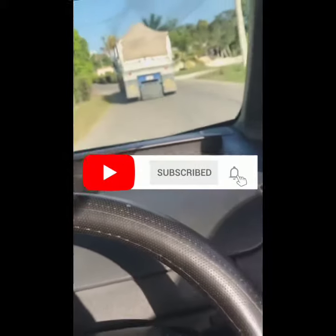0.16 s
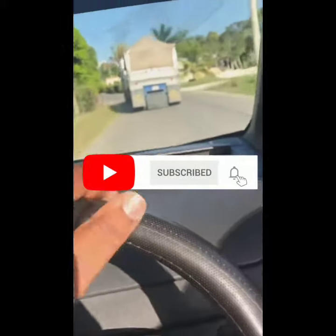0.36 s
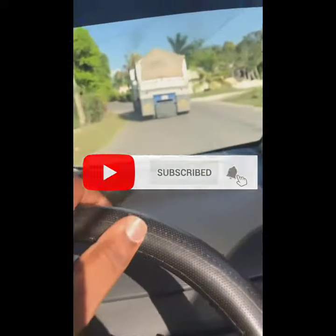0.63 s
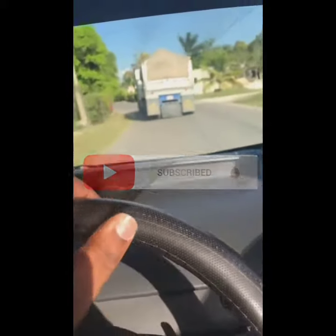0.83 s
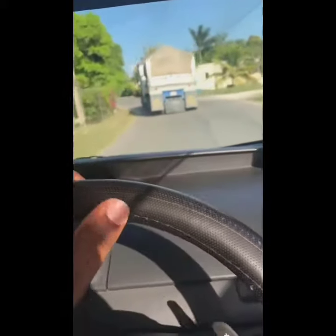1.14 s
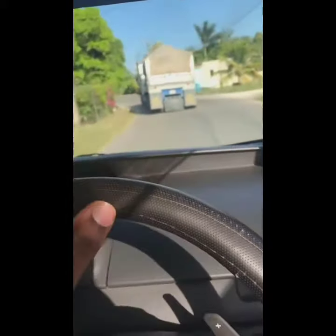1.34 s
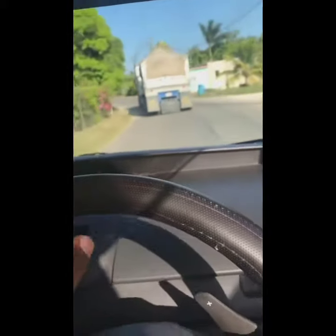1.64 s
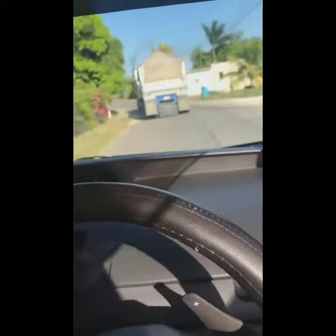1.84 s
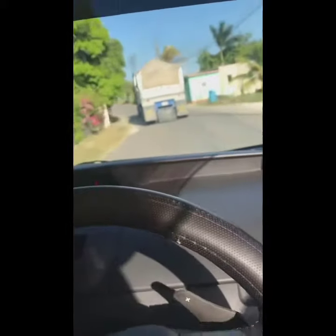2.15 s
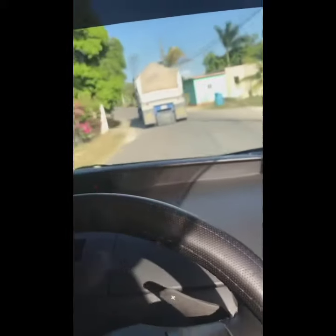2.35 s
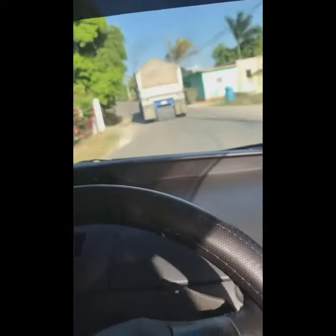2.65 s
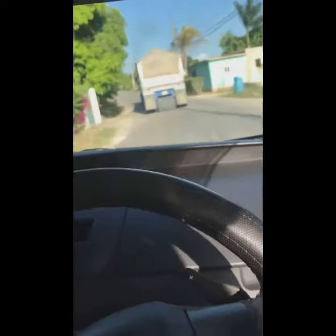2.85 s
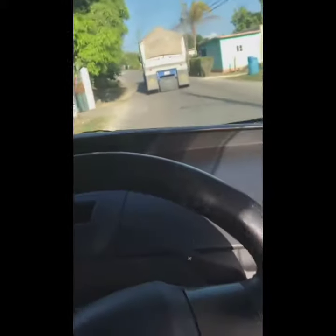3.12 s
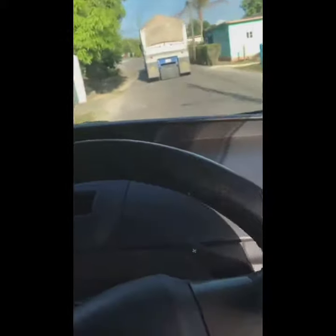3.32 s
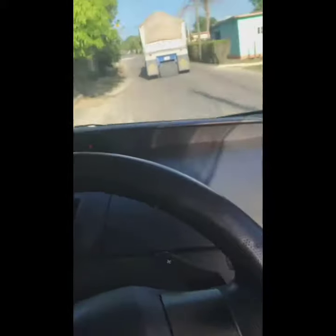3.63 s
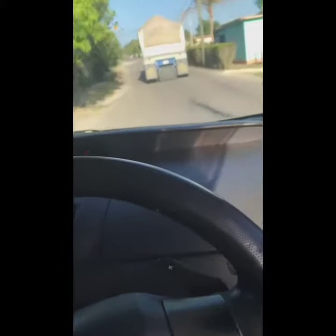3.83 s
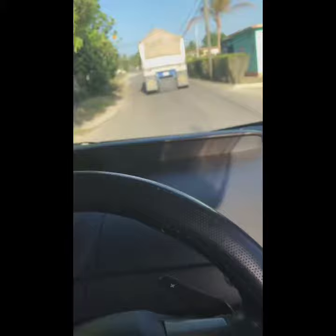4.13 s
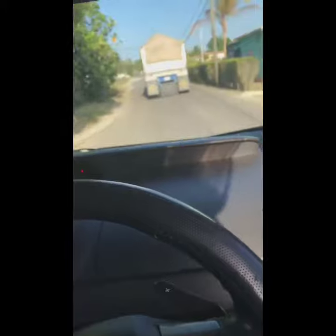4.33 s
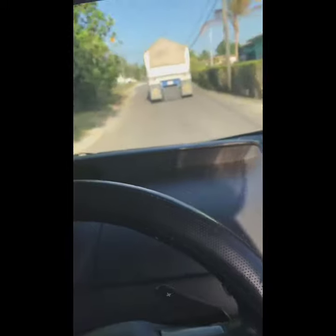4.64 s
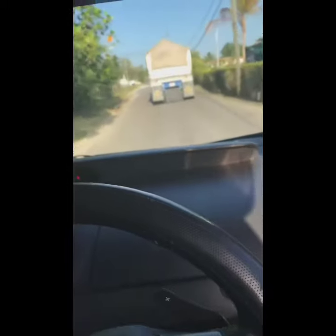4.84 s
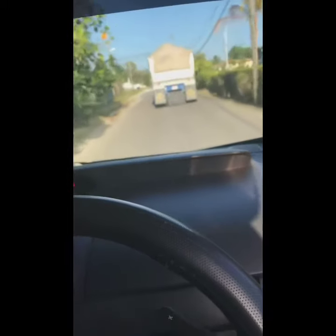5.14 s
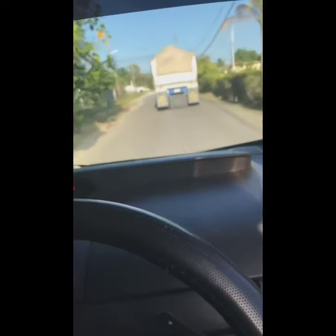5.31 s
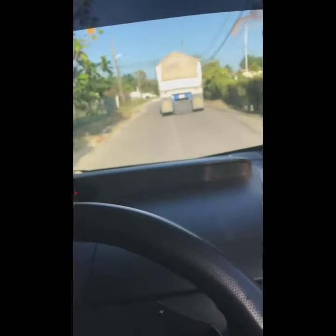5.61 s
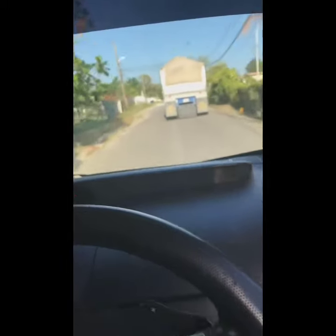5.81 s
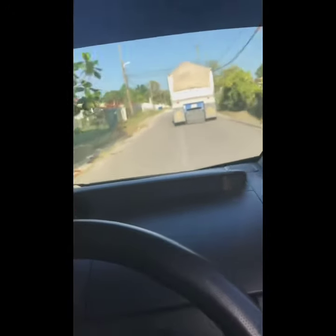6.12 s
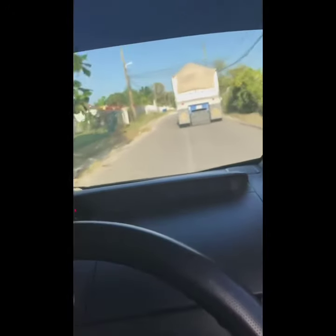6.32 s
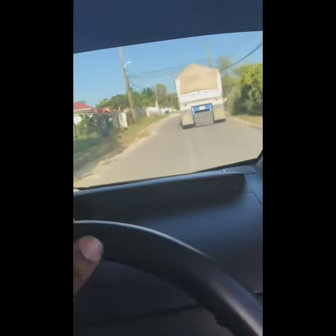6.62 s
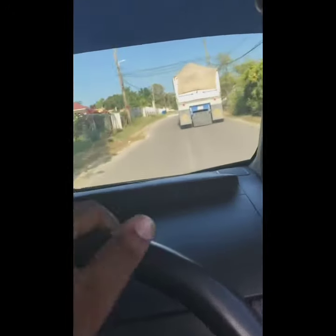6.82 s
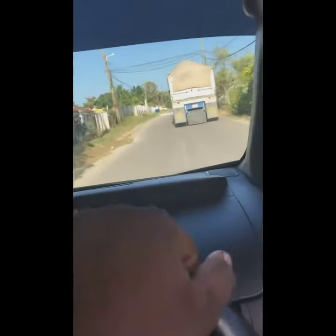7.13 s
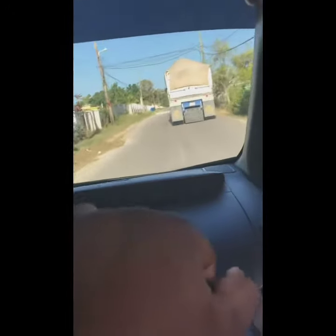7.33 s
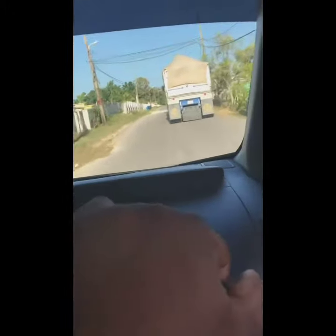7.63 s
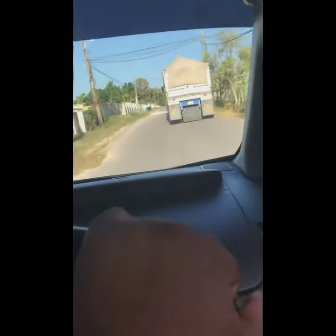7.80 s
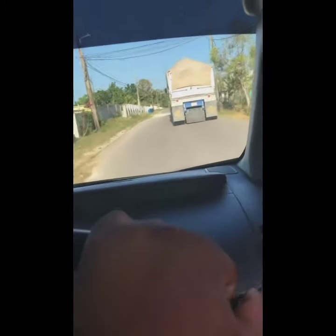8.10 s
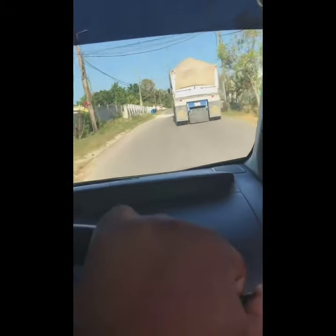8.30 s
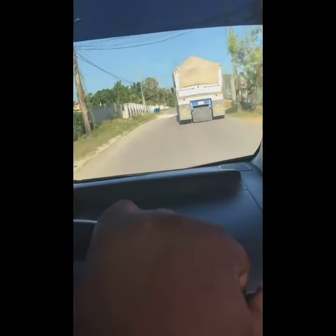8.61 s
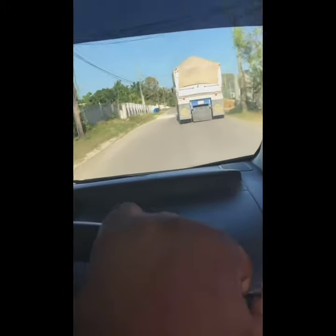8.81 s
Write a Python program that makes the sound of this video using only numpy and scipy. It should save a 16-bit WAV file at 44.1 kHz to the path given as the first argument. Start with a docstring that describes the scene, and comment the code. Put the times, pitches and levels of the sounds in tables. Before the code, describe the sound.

From the driver's seat, a rough diesel drone fills the cab over continuous tyre rumble. The throttle lifts and returns, dashboard panels buzz briefly, and a low exhaust tone from a lorry ahead rises and falls. After a quieter lift, a juddering gear engagement rattles, followed by slower, heavier engine pulses, thin trim rasp, a faint hand rub and two small late knocks.

```python
"""Inside the cab of a four-cylinder diesel truck following a lorry along a country road, over rumbling tyres.
The driver eases off, then pulls again: firing orders, gated noise and a whistling turbo, the lorry's tone ahead.
He lifts and changes up; the clutch bites with a judder of filtered clicks and the gears chatter.
The engine lugs on at low revs, booming through the cab resonances, with a hand sliding round the wheel,
rasping trim and at last two combustion knocks."""
import sys
import numpy as np
from scipy import signal
from scipy.fft import rfft, irfft
from scipy.io import wavfile

SR = 44100
rng = np.random.default_rng(int(sys.argv[2]) if len(sys.argv) > 2 else 0)


def put_to_file(sound):
    """Save the sound as 16-bit audio at rate SR, in the file named by the first command-line argument."""
    columns = np.atleast_2d(sound).T  # one column per channel
    safe = np.clip(columns, -1, 1)
    whole_steps = np.round(safe * 32767)
    wavfile.write(sys.argv[1], SR, whole_steps.astype(np.int16))


N = 395136

# Engine speed. Each row: time in seconds, firings per second.
SPEED = [(0, 92.5), (.27, 93.6), (.45, 80.3), (.85, 84), (1.27, 80.7), (1.54, 85.3), (1.9, 85.8),
         (2.5, 89.5), (3.23, 92), (3.29, 78.6), (3.99, 78.3), (4.16, 73), (4.7, 74), (4.95, 72.4),
         (5.5, 70.2), (6.4, 66.7), (7.3, 66.2), (7.8, 65.2), (8.3, 65.5), (8.55, 66.4), (8.96, 66.2)]
# How hard the engine is fuelled. Each row: time in seconds, effort in dB relative to full pull.
EFFORT = [(0, -0.5), (.28, 0), (.5, -5), (.8, -10.5), (1, -4.5), (1.22, -0.93), (2.2, 0.5), (3.15, -2),
          (3.26, -7.5), (3.5, -12), (4.68, -12), (4.76, -4), (6.3, -7), (6.52, -10), (7, -7.5), (7.4, -2.5),
          (7.7, -1.2), (8.96, -3)]
# Strength of each cylinder in firing order, in dB.
CYLINDER_DB = [0.95, -1.5, 0.61, -0.72]
# Laws of loudness. Each: level in dB at full pull and CRUISE_HZ, dB per dB of effort, dB per extra firing per second.
THUD_LAW = (-35, 0.92, 0.16)
CLATTER_LAW = (-36, 2.46, 0.48)
PANEL_LAW = (-37, 1.48, 0.25)
INTAKE_LAW = (-50, 0.61, 0.21)
CRUISE_HZ = 90.06   # firing rate
BOOST_LAG_S = 0.26   # the intake air follows the effort late

# Hum at twice the firing rate. Each row: time in seconds, level in dB.
HUM = [(0, -36), (.75, -37), (.94, -29), (1.06, -38), (1.24, -26.5), (1.36, -34.5), (1.8, -34.5),
       (2.2, -31), (3.2, -31), (3.27, -36.5), (4.01, -33), (4.12, -39.5), (5.3, -33), (6.5, -37.5),
       (7.8, -36.5), (8.96, -37.5)]
# Air resonances of the cab. Each row: centre in Hz, width in Hz, level in dB at full pull.
CAB_BOOMS = [(64.08, 3.9, -17.5), (81, 28.5, -29), (214, 9.8, -27.5)]
FIRST_ORDER_DB_PER_DB, THIRD_ORDER_DB_PER_DB = 0.74, 1.7   # rise with effort
BOOM_WAVER_DB = 1.84

# Spectrum of the block's thuds. Each row: frequency in Hz, relative density in dB per Hz.
BLOCK = [(330, -6.5), (385, -6.5), (470, 2.5), (570, -1), (690, 1), (780, -6.5), (890, 2.5), (980, 0),
         (1200, 0), (1500, -14.5), (1730, -5.5), (1900, -28.5), (4000, -30)]
# Spectrum of the cylinder head's cracks. Each row: frequency in Hz, relative density in dB per Hz.
HEAD = [(700, -4.5), (1200, -2.5), (1550, -3), (1700, 2), (1850, -8.5), (2040, -11.5), (2250, -23),
        (2950, -11.5), (3500, -19), (5000, -31)]
LUG_REGULAR_DB = 5   # at low revs under load the thuds repeat more exactly
# Rasping dashboard panels. Each row: centre in Hz, width in Hz, relative gain in dB.
PANELS = [(1327, 140, 2.5), (1742, 52, -2), (2077, 7.4, -12), (3220, 290, -16)]
PANEL_BEST_HZ, PANEL_FALL_DB_PER_HZ, PANEL_RANGE_DB = 84.7, 0.5, 11.5   # loudest near this firing rate
# Engine cover resonances at low revs. Each row: centre in Hz, width in Hz, relative gain in dB.
COVER_MODES = [(479, 22, 3.5), (718, 56, 3.5), (1060, 64, 0.5), (1197, 39, 1.5)]
COVER_DB = -39   # at full pull, fully lugging
# Rough drone of the engine. Each row: time in seconds, level in dB.
DRONE = [(0, -41.5), (.3, -49), (.42, -78), (.9, -43), (3.15, -46), (3.25, -75), (6.3, -59.5), (7.9, -45.5),
         (8.96, -50.5)]
DRONE_ORDER = 5.33   # cycles per firing

# Intake air spectrum. Each row: frequency in Hz, relative density in dB per Hz.
HISS = [(1900, 11.5), (2500, 9.5), (2950, 9.5), (3500, 7), (4950, -1), (6000, 1.5), (7700, -8),
        (9000, -4.5), (10500, -41)]
# Turbo whistle. Each row: time in seconds, pitch in Hz, level in dB.
TURBO = [(0, 10700, -77), (.48, 9300, -60.5), (.66, 8450, -66), (.9, 7740, -72), (1.5, 9100, -62.5),
         (1.72, 9400, -62), (2.4, 9200, -72.5), (3.45, 8856, -73), (3.8, 8130, -95)]

# Gear case resonances. Each row: centre in Hz, width in Hz, relative gain in dB.
GEARCASE = [(640, 95, 8.5), (830, 100, 13.5), (1130, 200, -5)]
# Rough tones of the gears. Each row: cycles per firing, width in Hz, level in dB before the bite envelope.
GEAR_TONES = [(7.5, 19, -46.5), (9.1, 24, -43), (11.7, 33, -52), (12.5, 26, -49)]
# Gearbox whine. Each row: time in seconds, pitch in Hz, level in dB.
WHINE = [(1.8, 237, -59), (2.1, 243.1, -43), (3.15, 273, -48.5), (3.4, 280, -40), (4.3, 279.8, -46.5),
         (6.2, 277.6, -51)]
CLUTCH_BITES_S = 4.68

# Driveline knocks at the clutch bite, then two combustion knocks of the lugging engine (the last two rows).
# Each row: time in seconds, click in dB before KNOCK_DB and colour.
KNOCKS = [(4.707, -19.5), (4.722, -15), (4.731, -16.5), (4.76, -14), (4.781, -20.5), (4.802, -16.5),
          (4.808, -22.5), (4.86, -12), (4.98, -23), (5.144, -26), (5.191, -26), (8.188, -23), (8.481, -27)]
# Colour of the knocks in the cab. Each row: frequency in Hz, gain in dB before KNOCK_DB.
KNOCK_COLOUR = [(70, -6), (185, 12.5), (270, -9), (450, -3), (630, -0.5), (730, -3.5), (1020, -1),
                (1270, -11), (1950, -25), (2500, -22.5), (3600, -36), (8000, -59)]
KNOCK_DB = 28.5   # how strongly the knocks reach the cab
# Ticks of gear lever and cab fittings. Each row: time in seconds, click in dB before the fittings ring.
TICKS = [(2.555, -51.5), (2.845, -50.5), (4.674, -60), (4.877, -62), (4.981, -58), (6.516, -58.5),
         (6.86, -57)]
# Ringing of the fittings. Each row: centre in Hz, width in Hz, relative gain in dB.
FITTINGS = [(2380, 360, 16), (3180, 470, 2), (4100, 550, 7)]

# Flares of dashboard buzz. Each row: time in seconds, half length in seconds, pitch in Hz, peak level in dB.
BUZZES = [(1.228, 0.051, 1290, -37), (1.783, 0.053, 1324, -35.5), (2.134, 0.02, 1805, -35),
          (2.607, 0.11, 1783, -39)]
# Thin rasp of loose trim. Each row: time in seconds, level in dB.
RASP = [(4.69, -87), (4.73, -50), (4.87, -47.5), (4.99, -53.5), (5.1, -56.5), (6.7, -63), (7.6, -52.5),
        (8.2, -63), (8.8, -57)]
# Resonances of that trim. Each row: centre in Hz, width in Hz, relative gain in dB.
RASP_MODES = [(1700, 200, 1.5), (2545, 340, 10.5), (4130, 330, -7.5)]
PALM_S, PALM_HALF_S, PALM_DB = 6.92, 0.44, -65   # a hand slides round the wheel rim

# Exhaust tone of the lorry ahead. Each row: time in seconds, pitch in Hz, level in dB.
LORRY = [(1.1, 37.8, -71), (1.4, 41.74, -30.5), (2.1, 56.7, -24), (2.3, 60.38, -32), (2.6, 73.2, -31.5),
         (3.1, 58.76, -33), (3.47, 53.76, -23.5), (3.85, 48.48, -42)]
# Tyre rumble spectrum. Each row: frequency in Hz, relative density in dB per Hz.
RUMBLE = [(26, -11), (33, -6), (42, -0.5), (56, 3.5), (68, -4.5), (82, 5), (100, -5.5), (125, -2),
          (160, -5), (290, -14.5), (400, -20.5), (700, -27), (1500, -33.5)]
ROAD_DB, ROAD_SWELL_DB = -29.5, 1.02   # tyre rumble and its swing over uneven tarmac
# Rough patches that drum in the cab. Each row: time in seconds, half length in seconds, peak level in dB.
BUMPS = [(4.424, 0.17, -25), (5.608, 0.075, -25), (6.197, 0.12, -31), (6.605, .1, -29)]
BUMP_HZ = 83.5
CUTOFF_HZ = 9750


def from_db(db):
    """Decibels to gain."""
    return 10 ** (np.asarray(db) / 20)


def rms_one(x):
    """Scale to unit rms."""
    return x / np.sqrt(np.mean(x ** 2) + 1e-20)


def in_time(rows):
    """The columns of a curve after its time column, one value per sample."""
    s, *columns = np.transpose(rows)
    return [np.interp(np.arange(N) / SR, s, c) for c in columns]


def drift(rate_hz):
    """Slow random wander of spread 1: two-pole noise, computed every 40 samples."""
    r = np.exp(-80 * np.pi * rate_hz / SR)
    noise = rng.standard_normal(N // 40 + 2002)
    slow = signal.lfilter([1], [1, -2 * r, r * r], noise)[2000:]   # skip the settling
    return np.interp(np.arange(N) / 40, np.arange(len(slow)), rms_one(slow))


def colour(x, spectrum, size=8192):
    """Minimum-phase filter with the given spectrum, falling steeply beyond its ends."""
    hz, db = np.transpose(spectrum)
    octave = np.log2(np.maximum(np.fft.rfftfreq(size, 1 / SR), 1))
    known = np.log2(hz)
    outside = np.abs(octave - np.clip(octave, known[0], known[-1]))
    gain_db = np.interp(octave, known, db) - np.minimum(30 * outside, 60)
    cepstrum = irfft(np.log(from_db(gain_db)))
    cepstrum[1:size // 2] *= 2   # fold onto positive time: causal
    cepstrum[size // 2 + 1:] = 0
    impulse = irfft(np.exp(rfft(cepstrum)))
    return signal.fftconvolve(x, impulse)[:N]


def resonate(x, modes):
    """Parallel two-pole resonances, each with its dB as the gain on top."""
    out = 0
    for hz, width_hz, db in modes:
        r = np.exp(-np.pi * width_hz / SR)
        poles = [1, -2 * r * np.cos(2 * np.pi * hz / SR), r * r]
        ringing = signal.lfilter([1, 0, -1], poles, x + 1e-18)
        out = out + from_db(db) * (1 - r * r) / 2 * ringing
    return out


def tone(turns):
    """Sine of unit rms on a running count of cycles."""
    return np.sqrt(2) * np.sin(2 * np.pi * turns)


def narrow_noise(turns, width_hz):
    """Smeared tone of unit rms: two quadrature carriers, each with its own slow random level."""
    return rms_one(drift(width_hz) * tone(turns) + drift(width_hz) * tone(turns + 1 / 4))


def gliding_tone(rows, waver_hz, waver_rate_hz, flutter_db):
    """A rotating part's tone, wavering in pitch and level."""
    hz, db = in_time(rows)
    turns = np.cumsum(hz + waver_hz * drift(waver_rate_hz)) / SR
    return from_db(db + flutter_db * drift(22)) * tone(turns)


def swells(rows):
    """Gaussian swell of each row's time, half length and peak dB."""
    t = np.arange(N) / SR
    return [from_db(db) * np.exp(-((t - s) / half_s) ** 2) for s, half_s, db in rows]


def by_law(law, effort_db, x):
    """An engine sound grows louder with effort and with speed."""
    full_db, per_effort, per_speed = law
    firing_hz, = in_time(SPEED)
    level_db = full_db + per_effort * effort_db + per_speed * (firing_hz - CRUISE_HZ)
    return from_db(level_db) * rms_one(x)


def firing_gate(turns, decay, depth, rise=.12):
    """Envelope that swells and dies at each firing (rise, decay in firings), by cylinder and by chance."""
    firing = np.floor(turns).astype(int)
    phase = turns % 1
    chance_db = 1.6 * rng.standard_normal(1000)[firing]
    strength = from_db(np.take(CYLINDER_DB, firing % len(CYLINDER_DB)) + chance_db)
    burst = np.minimum(phase / rise, 1) * np.exp(-phase / decay)
    share = np.clip(depth, 0, 1)
    return rms_one(1 - share + share * rms_one(strength * burst))


def crank_pattern(turns, jitter, half_order_db, size=4096):
    """Vibration repeating every crank turn (two firings): low firing harmonics and weaker half orders."""
    orders = np.exp(2j * np.pi * rng.random(size // 2 + 1))
    orders[1::2] *= from_db(half_order_db)
    orders[64:] = 0
    angle = (turns + jitter * drift(30)) / 2 % 1
    return rms_one(np.interp(angle * size, np.arange(size), irfft(orders)))


def excitation(turns, regular_db, decay, depth, jitter=0.014):
    """Vibration that repeats with the crank, under random bursts at each firing."""
    regular = from_db(regular_db) * crank_pattern(turns, jitter, half_order_db=-0.5)
    return regular + rng.standard_normal(N) * firing_gate(turns, decay, depth)


def after_bite(attack_s, hold_s, sag_db_per_s, release_s):
    """Envelope from the clutch's bite: a quick rise, a sagging hold, then a decay."""
    age = np.maximum(np.arange(N) / SR - CLUTCH_BITES_S, 0)
    release = np.exp(-np.maximum(age - hold_s, 0) / release_s)
    return np.minimum(age / attack_s, 1) * from_db(-sag_db_per_s * age) * release


def blows(events, scatter_s, scatter_db):
    """Each contact is a click with a dying scatter of noise."""
    out = np.zeros(N)
    age = np.arange(SR // 5) / SR
    for s, db in events:
        burst = from_db(scatter_db) * rng.standard_normal(len(age)) * np.exp(-age / scatter_s)
        burst[0] += 1
        at = round(s * SR)
        out[at:at + len(age)] += from_db(db) * burst[:N - at]
    return out


def combustion(turns, firing_hz, effort_db):
    """Each firing thuds through the block, rings the cylinder head and shakes the panels."""
    # under load at low revs the strokes stand apart
    lugging = np.clip((85 - firing_hz) / 20, 0, 1) * from_db(0.68 * effort_db)
    uneven = from_db(.6 * drift(14))

    regular_db = -12.5 + LUG_REGULAR_DB * lugging
    strokes = excitation(turns, regular_db, decay=0.25, depth=0.38 + 0.76 * lugging, jitter=0.0071)
    thuds = by_law(THUD_LAW, effort_db, colour(strokes, BLOCK))

    clatter = excitation(turns, regular_db=-13.0, decay=0.73, depth=0.25 + .5 * lugging)
    cracks = by_law(CLATTER_LAW, effort_db, colour(clatter * from_db(.5 * drift(11.0)), HEAD))

    shaking = excitation(turns, regular_db=-8, decay=0.73, depth=0.22)
    panels = resonate(shaking, PANELS) * from_db(2.4 * drift(9.1))
    off_best_db = np.minimum(PANEL_FALL_DB_PER_HZ * np.abs(firing_hz - PANEL_BEST_HZ), PANEL_RANGE_DB)
    rasp = from_db(-off_best_db) * by_law(PANEL_LAW, effort_db, panels)
    return uneven * (thuds + cracks + rasp)


def boom(turns, firing_hz, effort_db):
    """First and third firing orders swell near the cab's resonances; the second is a firm, clean hum."""
    hum_db, = in_time(HUM)
    out = from_db(hum_db + drift(6)) * tone(2 * turns)
    for order, db_per_db in ((1, FIRST_ORDER_DB_PER_DB), (3, THIRD_ORDER_DB_PER_DB)):
        responses = [from_db(db) / (1 + (2 * (order * firing_hz - hz) / width_hz) ** 2)
                     for hz, width_hz, db in CAB_BOOMS]
        level = from_db(db_per_db * effort_db + BOOM_WAVER_DB * drift(10.0))
        out = out + np.linalg.norm(responses, axis=0) * level * tone(order * turns)
    return out


def growl(turns, firing_hz, effort_db):
    """Lugging at low revs, each heavy stroke rings the engine cover."""
    lugging = np.clip((69 - firing_hz) / 3, 0, 1)
    strokes = excitation(turns, regular_db=-6, decay=.35, depth=.95, jitter=.01)
    chug = 1 + .55 * np.sin(np.pi * (turns + 1 / 4))   # every other stroke is the heavier
    level = from_db(COVER_DB + 1.41 * effort_db + drift(9))
    return lugging * level * rms_one(resonate(strokes * chug, COVER_MODES))


def drone(turns):
    """Rough narrow-band drone whose pitch follows the revs."""
    db, = in_time(DRONE)
    return from_db(db) * narrow_noise(DRONE_ORDER * turns, width_hz=19.3)


def intake(turns, effort_db):
    """Air hisses into the engine as the boost, a lagged effort, builds and dies away."""
    r = np.exp(-1 / (BOOST_LAG_S * SR))
    boost_db = signal.lfilter([1 - r], [1, -r], effort_db)
    air = rng.standard_normal(N) * firing_gate(turns, decay=0.97, depth=0.13) * from_db(.8 * drift(4.8))
    return by_law(INTAKE_LAW, boost_db, colour(air, HISS))


def turbo(width_hz):
    """Compressor blades make a breathy whistle: narrow noise on a gliding pitch."""
    hz, db = in_time(TURBO)
    return from_db(db + 2 * drift(15)) * narrow_noise(np.cumsum(hz) / SR, width_hz)


def gear_chatter(turns):
    """After the bite each firing jerks the gears through their backlash; broken tones follow the revs."""
    jerks = excitation(turns, regular_db=11.0, decay=0.53, depth=0.36, jitter=0.02)
    case = rms_one(resonate(jerks, GEARCASE))
    mesh = sum(from_db(db) * narrow_noise(order * turns, width_hz) for order, width_hz, db in GEAR_TONES)
    chatter = from_db(-43.5) * case + mesh * firing_gate(turns, decay=0.36, depth=0.59)
    return chatter * after_bite(attack_s=0.05, hold_s=1.653, sag_db_per_s=1.5, release_s=0.072)


def gear_whine():
    """Gearbox whine: a gliding, fluttering sine."""
    return gliding_tone(WHINE, waver_hz=3.6, waver_rate_hz=14, flutter_db=2.0)


def knocks_and_rattle():
    """Driveline knocks and a rattle of contacts at the bite, then two combustion knocks: coloured clicks."""
    knocks = blows(KNOCKS, scatter_s=0.008, scatter_db=-28)
    contacts = rng.standard_normal(N) * (rng.random(N) < 900 / SR)   # about 900 per second
    rattle = contacts * after_bite(attack_s=.05, hold_s=.22, sag_db_per_s=8, release_s=.05)
    return from_db(KNOCK_DB) * colour(knocks + from_db(-36) * rattle, KNOCK_COLOUR)


def fitting_ticks():
    """Softened clicks ring the plastic fittings."""
    ticks = blows(TICKS, scatter_s=.01, scatter_db=1)
    soft = signal.sosfilt(signal.butter(2, 6000, fs=SR, output="sos"), ticks)
    return from_db(9.5) * resonate(soft, FITTINGS)


def trim_buzz(turns):
    """Loose trim buzzes in step with the firings: short dashboard flares, and a thin rasp after the bite."""
    t = np.arange(N) / SR
    envelopes = swells([(s, half_s, db) for s, half_s, _, db in BUZZES])
    flares = sum(env * narrow_noise(row[2] * t, width_hz=83) for env, row in zip(envelopes, BUZZES))
    rasp_db, = in_time(RASP)
    rasp = from_db(rasp_db) * rms_one(resonate(rng.standard_normal(N), RASP_MODES))
    return (flares + rasp) * firing_gate(turns, decay=0.99, depth=0.36)


def palm():
    """A hand sliding over the steering wheel's cover gives a soft swell of hiss."""
    swell = np.exp(-((np.arange(N) / SR - PALM_S) / PALM_HALF_S) ** 2)
    band = signal.butter(1, [3500, 8000], "band", fs=SR, output="sos")
    rub = signal.sosfilt(band, rng.standard_normal(N))
    return from_db(PALM_DB + 1.5 * drift(15)) * swell * rms_one(rub)


def reflections(x, echo_db, ring_s, size=3072):
    """Windscreen and hard trim return the upper range as a quick cluster of reflections."""
    age = np.arange(size) / SR
    echoes = rng.standard_normal(size) * np.exp(-age / ring_s) * (age > .002)
    treble = signal.sosfilt(signal.butter(2, 1400, "high", fs=SR, output="sos"), x)
    return x + from_db(echo_db) * signal.fftconvolve(treble, echoes / np.linalg.norm(echoes))[:N]


def lorry_ahead():
    """Exhaust of the lorry ahead: a low gliding sine."""
    return gliding_tone(LORRY, waver_hz=0.82, waver_rate_hz=13.0, flutter_db=1.0)


def road():
    """Tyre rumble through the body is coloured noise; rough patches set the cab drumming."""
    level = from_db(ROAD_DB + ROAD_SWELL_DB * drift(4.2))
    rumble = level * rms_one(colour(rng.standard_normal(N), RUMBLE))
    drumming = tone(np.cumsum(BUMP_HZ + 2.15 * drift(12.3)) / SR)
    return rumble + sum(swells(BUMPS)) * from_db(2.2 * drift(12)) * drumming


def scene():
    """Engine, turbo, gearbox, road and the lorry ahead, heard from the driver's seat."""
    firing_hz, = in_time(SPEED)
    effort_db, = in_time(EFFORT)
    turns = np.cumsum(firing_hz * (1 + 0.002956 * drift(7.595))) / SR   # running count of firings
    engine = combustion(turns, firing_hz, effort_db) + boom(turns, firing_hz, effort_db)
    engine = engine + growl(turns, firing_hz, effort_db) + drone(turns)
    air = intake(turns, effort_db) + turbo(width_hz=310)
    gearbox = gear_chatter(turns) + gear_whine()
    cab = knocks_and_rattle() + fitting_ticks() + trim_buzz(turns) + palm()
    inside = reflections(engine + air + gearbox + cab, echo_db=-8.5, ring_s=.011)
    return (inside + lorry_ahead() + road())[None]


def record(dry):
    """The microphone drops the deepest bass; the top is cut steeply."""
    thin = signal.sosfilt(signal.butter(2, 24, "high", fs=SR, output="sos"), dry)
    return signal.sosfilt(signal.ellip(12, .2, 70, CUTOFF_HZ, fs=SR, output="sos"), thin)


dry = scene()
out = record(dry)
put_to_file(out)
```